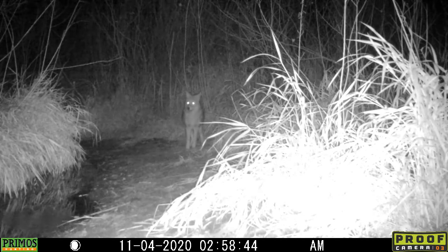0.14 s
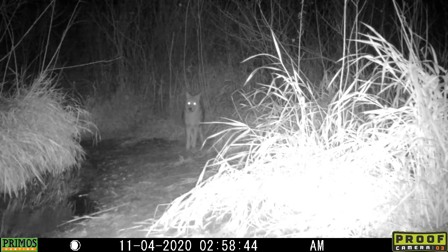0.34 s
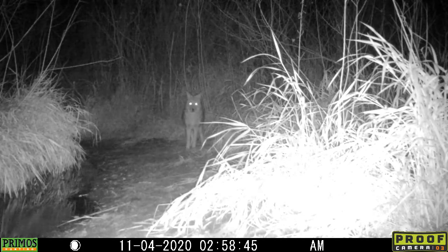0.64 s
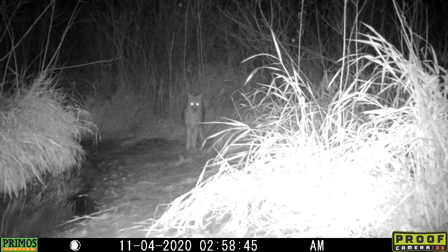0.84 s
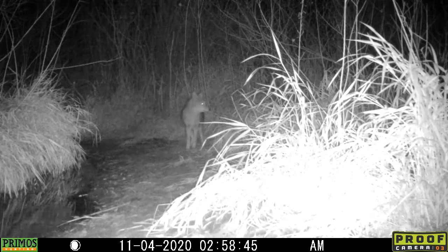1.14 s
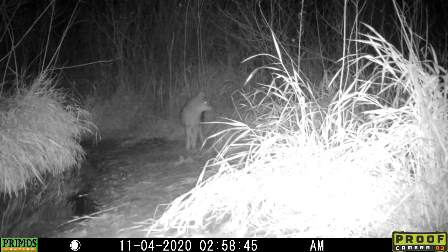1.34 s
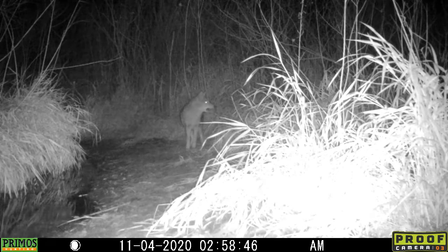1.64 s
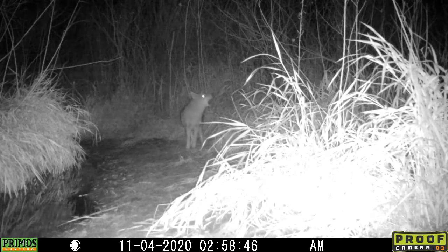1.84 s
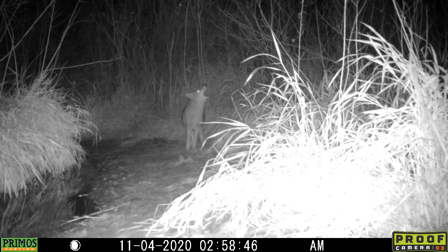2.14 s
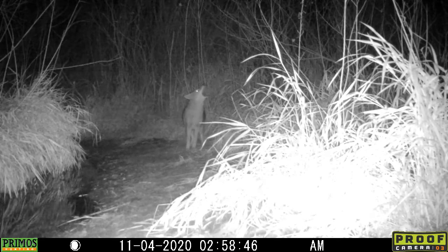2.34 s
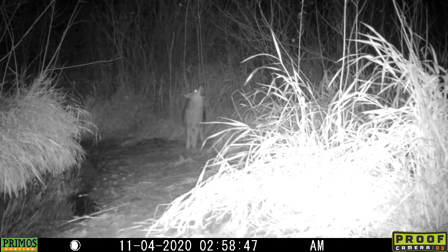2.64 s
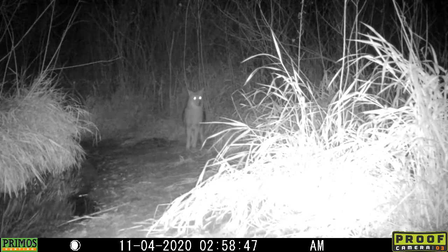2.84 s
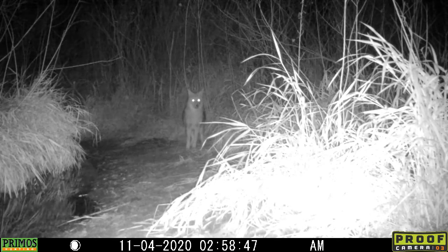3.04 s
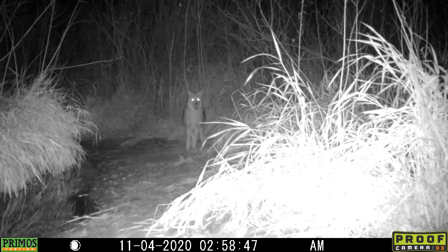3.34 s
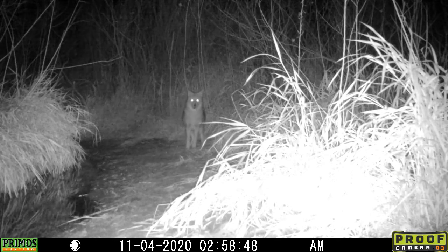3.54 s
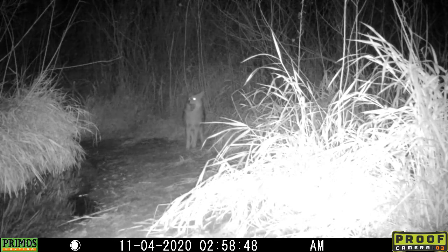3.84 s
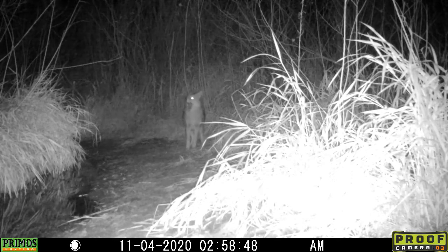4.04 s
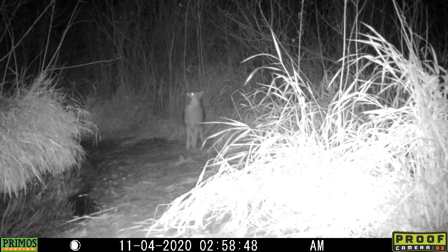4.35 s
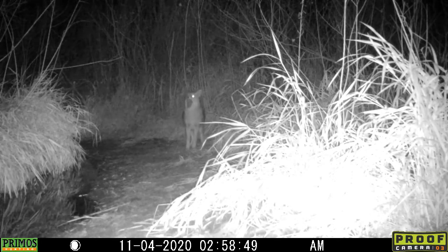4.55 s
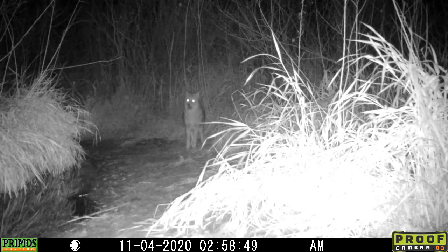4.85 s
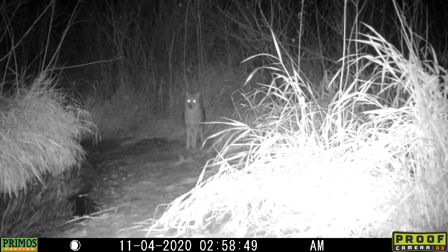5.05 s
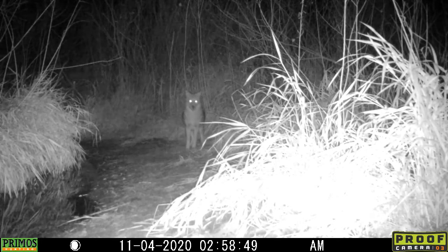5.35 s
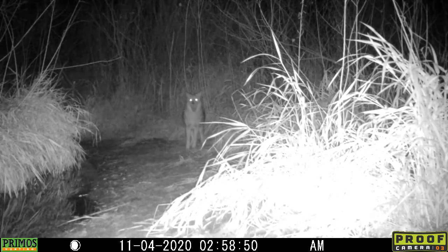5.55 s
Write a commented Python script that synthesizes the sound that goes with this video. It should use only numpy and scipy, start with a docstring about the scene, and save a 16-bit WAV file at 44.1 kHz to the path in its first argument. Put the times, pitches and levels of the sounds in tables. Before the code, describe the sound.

Over the steady hiss and rumble of night air on a small outdoor microphone, a nearby coyote yips and whines softly, then breaks into louder yips and two high, sliding howls. Its voice jumps suddenly in pitch and rasps on the fast glides. Other coyotes yip back from further off, and a faraway chorus rises and eases. A last short yipping call follows, with a slight dull echo from the brush.

```python
"""A short, sharp yip sinks into a soft whine: a coyote a few metres off in a thicket at night.
It builds to loud yips and howls while a packmate, a thin high voice and a distant chorus answer.
Vocal folds sing clean overtones that flip register with a crack of air; throat and jaw colour them,
and fast glides turn them hoarse. Trees add a short echo over the hiss of night air and a trail camera."""
import sys
import numpy as np
from scipy import signal
from scipy.fft import rfft, irfft, next_fast_len
from scipy.io import wavfile
from scipy.ndimage import uniform_filter1d

SR = 44100
rng = np.random.default_rng(int(sys.argv[2]) if len(sys.argv) > 2 else 0)


def bounce(signal):
    """Save signal as a 16-bit WAV file at the path given by the first command-line argument."""
    frames = np.transpose(np.atleast_2d(signal))
    limited = np.clip(frames, -1, 1)
    pcm = np.round(limited * 32767).astype(np.int16)
    wavfile.write(sys.argv[1], SR, pcm)


N = 250488
TOP_HZ = 14250

# near coyote, one list per call; rows a millisecond apart are register flips:
# t/s, pitch/Hz, effort/dB, jaw opening/0-1, partials above the 4th/dB
NEAR_CALLS = [
    [(0.045, 529, -53, 0.15, -9), (0.069, 625, -53.5, 0.0, -10), (0.086, 668, -54, 0.04, -9),
     (0.087, 868, -37, 0.7, -16), (0.105, 955, -34.5, 0.64, -10), (0.106, 1240, -36, 0.3, -12),
     (0.132, 1272, -36.5, 1, -12), (0.147, 891, -38.5, 0.3, -18), (0.16, 844, -41.5, 0.1, -20),
     (0.19, 819, -54, 0.01, -22.0), (0.265, 720, -53.5, 0.0, -3), (0.384, 453, -68, 0.1, -8),
     (0.436, 440, -63, 0.06, -2), (0.574, 431, -62, 0.09, -8), (0.662, 458, -55, 0.1, -4),
     (0.738, 606.6, -52, 0.03, -4), (0.806, 599, -48.5, 0.14, -8), (0.91, 507, -58.5, 0.14, -16.0),
     (0.95, 468, -62, 0.05, -11)],
    [(1.395, 662.0, -39.5, 0.4, -15.0), (1.431, 842, -34.5, 0.71, -18), (1.475, 677.0, -55, 0.7, -16)],
    [(1.705, 757.0, -39, 0.96, -20), (1.733, 974.0, -32, 0.14, -15), (1.795, 810, -38.5, 0.35, -7),
     (1.825, 1001, -28, 0.09, -4), (1.826, 1314, -16, 0.62, -27), (1.856, 1556, -11.5, 0.19, -19.5),
     (1.904, 1616, -18.5, 0.25, -17), (1.92, 1370, -15, 0.29, -37), (1.921, 1071, -23.5, 0.36, -21),
     (1.934, 1015, -27, 0.53, -20), (1.95, 750.0, -33, 0.6, -20.0), (1.988, 720.0, -38, 0.6, -19),
     (2.008, 785, -32.5, 0.5, -15), (2.03, 935, -27.5, 0.29, -27), (2.086, 934, -29, 0.11, -4.5),
     (2.132, 985, -28.0, 0.0, -19), (2.19, 962, -28.5, 0.1, -5), (2.224, 939, -29, 0.14, -10.5),
     (2.26, 947.0, -30.5, 0.06, -6.5), (2.398, 938, -27, 0.14, -12.5), (2.534, 905, -30.5, 0.17, -7),
     (2.648, 876, -31, 0.25, 1.5), (2.7, 820, -33.5, 0.31, -2), (2.74, 769, -36.5, 0.3, 2),
     (2.77, 542, -47, 1.0, -13)],
    [(3.134, 569, -46, 0.68, -11), (3.146, 590, -34.5, 0.64, -10), (3.156, 683, -40.5, 0.44, -9),
     (3.174, 780, -27, 0.74, -11), (3.195, 886, -33.5, 0.71, -8), (3.211, 721, -31.5, 0.74, -6.5),
     (3.26, 477, -45, 0.81, -16)],
    [(3.548, 694, -39, 0.39, -2), (3.56, 747, -31, 0.4, -5), (3.572, 834.0, -34.5, 0.1, -6),
     (3.593, 1010, -20, 0.66, -4), (3.594, 1536, -22, 1.0, -11.0), (3.62, 1822, -21.5, 1.0, -3),
     (3.66, 1970, -22.0, 1.0, -16), (3.734, 1940, -24.5, 0.93, -14), (3.806, 1823, -24.5, 0.82, -14),
     (3.854, 1624, -26, 0.4, -5), (3.88, 1287, -27.0, 0.56, -17), (3.924, 1314, -27.5, 0.73, -14),
     (3.974, 1410, -24.0, 0.38, -16), (4.0, 1318, -25, 0.64, -10), (4.02, 1094, -24.5, 0.77, -17),
     (4.04, 908, -22.5, 0.63, -15.5), (4.1, 872, -25.5, 0.69, -14), (4.112, 899, -21, 0.7, -18),
     (4.126, 1067, -26.5, 0.77, -11), (4.184, 1246, -25.5, 1.0, -13), (4.23, 1496, -20, 0.12, -35),
     (4.256, 1340.0, -25.5, 0.96, -14), (4.286, 1180, -25.0, 0.91, -13.5), (4.406, 1267, -20.5, 0.99, -14),
     (4.44, 1204, -21.5, 0.68, -7.5), (4.484, 1035, -21.5, 0.77, -7.5), (4.524, 956, -25.0, 0.51, -2),
     (4.654, 801, -37.5, 0.09, -0.5), (4.75, 691, -49, 0.01, -1), (4.786, 529.5, -52.0, 0.32, 3),
     (4.84, 474, -55, 0.17, -2)],
    [(5.357, 698, -53, 0.58, -4), (5.373, 843, -26.5, 0.81, -12.5), (5.388, 997, -27, 0.53, -11),
     (5.405, 1187, -31, 0.56, -16), (5.435, 998, -30.5, 0.89, -8), (5.461, 1210.0, -32, 0.7, -12),
     (5.471, 1218, -35.0, 1, -13.0), (5.473, 1632, -29.5, 0.26, -12), (5.491, 1582, -27, 0.24, -20.0),
     (5.506, 1213, -31.5, 0.92, -8), (5.548, 1024, -27.0, 0.69, -17), (5.59, 767, -30.5, 0.7, -11),
     (5.608, 736, -39.5, 0.5, -7), (5.64, 745, -34.5, 0.62, -10), (5.68, 769.0, -29.5, 0.67, -10)],
]
# rasp of each near call on a held pitch: hoarseness/0-1
NEAR_HOARSENESS = [0.18, 0.32, .02, 0.4305, 0.196, 0.351]
# spells where strong and weak cycles alternate without a push: t/s, length/s, level re effort/dB
DOUBLED_SPELLS = [(5.588, .1, -11.5)]
# packmate further off, one pitch arch per call:
# t/s, length/s, first f/Hz, turning f/Hz, last f/Hz, turn point/share of length, effort/dB, jaw/0-1
PACKMATE_CALLS = [(0.02, 0.21, 790, 832, 832, .4, -48.5, 0.9), (.18, .215, 835, 950, 920, .45, -47.5, 0.7),
                  (.4, .04, 906, 850, 780, .5, -55, 0.7), (.57, 0.14, 758.4, 827.5, 809, .2, -48.5, 1),
                  (1.05, .158, 678, 731.6, 890, .55, -45.5, 0.9),
                  (1.212, .185, 845, 923, 840, .7, -43.5, 1), (1.62, 0.11, 688, 802, 899, .5, -45.5, 0.77),
                  (2.73, 0.14, 877, 943, 860, .45, -43.5, 1), (2.87, .095, 1027, 1050, 1065, .3, -47, 0.64),
                  (2.975, 0.097, 920, 765, 790, .6, -46, 0.61),
                  (3.262, .068, 794, 890, 755, .6, -38.5, 0.83), (3.335, 0.13, 770, 941, 920, .7, -46, .8),
                  (4.67, 0.13, 884, 965, 940, .7, -49, 0.81), (4.795, 0.12, 880, 790, 717, .5, -59, .5)]
# thin high voice: same columns
THIN_CALLS = [(2.56, 0.092, 1404, 1536, 1337, 0.49, -42.5, 0.64),
              (3.36, 0.12, 1230, 1426, 1400, 0.68, -37.5, 0.63),
              (3.455, .07, 1413, 1006, 630, 0.49, -59, 0.53),
              (4.165, 0.1, 1395, 1680, 1403, 0.48, -39, 0.7),
              (4.575, 0.12, 1262, 1316, 1230, 0.373, -45.5, 0.86),
              (4.79, .17, 1045, 871, 733, 0.54, -64, 0), (4.965, 0.087, 1224, 1290, 1298, .2, -59, 1)]
# fader ride of the distant chorus: t/s, level/dB
CHORUS_RIDE = [(0, -59), (.9, -55), (1.6, -53), (2.599, -49), (3.1, -46), (3.6, -44), (4.7, -43.5),
               (5.1, -56), (5.35, -54), (5.68, -50)]
# partials 1-4 at the vocal folds: level/dB
FOLDS_DB = [0.063, 0.064, -1.15, -1.7]
# throat tone for partials 1-4, jaw closed and open: f/Hz, level/dB
CLOSED_LOW = [(430.0, 22.5), (650.0, 23.5), (900.0, 12.5), (1100.0, 4), (1300.0, -13), (1600.0, 9.5),
              (2000.0, -1), (2500.0, 5.5), (3000.0, 1), (3600.0, -23.5), (4400.0, -24), (6000.0, -18)]
OPEN_LOW = [(430, -39), (650, -22), (900, -43), (1100, -18.5), (1300, 9), (1600, 1), (2000, -0.5),
            (2500, -5), (3000, -6), (3600, -8.5), (4400, 0), (5000, -3.5), (5600, -3.5), (6100, -27),
            (7600, -19)]
# open-jaw tone of the packmate, whose 1st partial does not carry: f/Hz, level/dB
PACKMATE_OPEN_LOW = [(700, -26), (1100, -16), (1400, 9), (1800, 0), (2700, -13), (3600, -10.5), (4400, -11)]
# throat and mouth tone for upper partials and breath, jaw closed and open: f/Hz, level/dB
CLOSED_HIGH = [(600, -5), (1600, 12), (2850, -1), (3700, -19), (4700, -30), (5600, -12.5), (6200, -7),
               (7000, 9), (7600, -2.5), (8300, -13), (9500, -25), (11000, -13), (14000, -34)]
OPEN_HIGH = [(600, -17), (1600, -14), (2850, -1), (3700, 0), (4400, 11), (5050, 18.5), (5500, 6),
             (6000, -4.5), (6700, -10), (7400, -10), (8200, -4), (9300, -7), (11000, -26), (14000, -23)]
# narrow bands that nearby echoes seem to cancel: f/Hz, width/Hz, share removed/0-1
ECHO_NOTCHES = [(1410, 310, 0.74), (4360, 460, 0.64), (5300, 220, 1), (6890, 260, 0.5), (8060, 630, 0.84),
                (11500, 640, 0.67)]
# tone of the noise bed: f/Hz, relative level/dB
HISS_TONE = [(8.8, -47), (15, 0.5), (43, -2.5), (119, -6.5), (223, -11), (289, -13.5), (333, -13.5),
             (766, -22), (936, -25), (1320, -27.5), (2350, -36.5), (11700, -46.5), (14300, -50.5)]


def coyote(calls, held_hoarseness, open_low, partials, doubled=(),
           fade_s=0.0049, waver=0.001993, shimmer_db=1.92):
    """Vocal folds sing partials on a gliding pitch; hoarse cycles are uneven and leak air."""
    rows = np.concatenate([np.column_stack([call, np.full(len(call), held)])
                           for call, held in zip(calls, held_hoarseness)])
    rows = rows[np.argsort(rows[:, 0])]
    t = np.arange(N) / SR
    slew = int(0.0063 * SR)
    effort_db, jaw, upper_db, hoarse = (uniform_filter1d(np.interp(t, rows[:, 0], column), slew)
                                        for column in rows[:, 2:].T)
    hz, crack, glide = register_flips(np.interp(t, rows[:, 0], np.log(rows[:, 1])), slew)
    jaw = np.clip(jaw, 0, 1)
    hoarse = np.clip(hoarse + 0.222 * glide, 0, 1)  # fast glides roughen the voice
    calling = sum((t > call[0][0] - .001) & (t < call[-1][0] + .001) for call in calls) > 0
    gate = uniform_filter1d(1. * calling, int(fade_s * SR))
    jitter = (0.001514 + 0.01994 * hoarse) * walk(300)
    phase = 2 * np.pi * np.cumsum(hz * (1 + jitter + waver * walk(25))) / SR

    def throat_db(k, opened, closed):
        """The jaw crossfades partial k between two throat tones."""
        return jaw * colour_db(opened, k * hz) + (1 - jaw) * colour_db(closed, k * hz)

    def partial(k, db):
        """One shimmering line at k times the pitch; high ones blur and drop out in patches."""
        db = db + shimmer_db * walk(30)
        treble = np.clip(k * hz / 1000 - 3.2, 0, 5)
        dropout_db = (1.24 + 4.5 * hoarse) * treble * np.abs(walk(16))
        rasp_db = 5 * hoarse * walk(120)
        smear = (0.014 + 0.26 * hoarse) * walk(200)
        gain = np.sqrt(2) * undb(db - dropout_db + rasp_db) * (k * hz < TOP_HZ)
        return gain * np.sin(k * (phase + smear) + k * k / 3)

    low_db = [effort_db + FOLDS_DB[k - 1] + throat_db(k, open_low, CLOSED_LOW) for k in (1, 2, 3, 4)]
    voice = sum(partial(k, db) for k, db in enumerate(low_db, 1))
    half_partials = (2.5, 3.5, 4.5)
    for start, length, db in doubled:
        spell = uniform_filter1d(1. * (t > start) * (t < start + length), slew)
        voice += spell * sum(partial(k, effort_db + db) for k in half_partials)
    if partials > 4:
        high_db = effort_db + upper_db
        for k in range(5, partials + 1):
            voice += partial(k, high_db + throat_db(k, OPEN_HIGH, CLOSED_HIGH))
        # pushed hard, strong and weak cycles alternate and lines appear between the partials
        push_db = low_db[0] + 13
        split_db = np.minimum(1.55 * push_db - 14, 0)
        for k in half_partials:
            voice += partial(k, high_db + split_db)
    voice_level = np.sqrt(sum(undb(db) ** 2 for db in low_db))
    air = jaw * noise(OPEN_HIGH) + (1 - jaw) * noise(CLOSED_HIGH)
    air_db = -30 + 18 * hoarse + 10 * crack
    breath = undb(air_db) * voice_level * (1 + np.cos(phase)) * air  # one puff per cycle
    return gate * (voice + breath)


def register_flips(log_pitch, slew, bend_s=0.01164):
    """The folds bend smoothly but flip at once: gives pitch/Hz, crack/0-1, glide/octaves per 0.1 s."""
    step = np.diff(log_pitch, prepend=log_pitch[0])
    flips = step * (np.abs(step) > 60 / SR)
    register = np.cumsum(flips)
    hz = np.exp(uniform_filter1d(log_pitch - register, int(bend_s * SR)) + register)
    flip_pulse = uniform_filter1d(uniform_filter1d(np.abs(flips), slew), slew)
    crack = np.minimum(flip_pulse * slew * 6, 1)
    glide = uniform_filter1d(np.abs(step - flips), int(0.025 * SR)) * SR / np.log(2) / 10
    return hz, crack, glide


def answers(events, open_low, swell_db=2, **voicing):
    """Lightly hoarse four-partial calls arch through three pitches as the level swells and sinks."""
    arc = np.linspace(-1, 1, 9)
    calls = []
    for start, length, first, mid, last, turn, db, jaw in events:
        t = start + length * np.interp(arc, [-1, 0, 1], [0, np.clip(turn, .1, .9), 1])
        hz = mid + arc * (last - first) / 2 + arc ** 2 * ((first + last) / 2 - mid)
        effort_db = db - swell_db * arc ** 2
        calls.append(np.column_stack([t, hz, effort_db, np.full(9, jaw), np.zeros(9)]))
    return coyote(calls, [.1] * len(calls), open_low, partials=4, **voicing)


def chorus(voices=9, centre_hz=802, waver=.16, come_go_db=6):
    """Wandering voices far back in the brush; only partials 2 and 3 carry, drifting in and out."""
    blend = np.zeros(N)
    for _ in range(voices):
        hz = centre_hz * np.exp(waver * walk(7) + .01 * walk(200))
        phase = 2 * np.pi * np.cumsum(hz) / SR
        blend += undb(come_go_db * walk(9)) * np.sin(2 * phase)
        blend += undb(come_go_db * walk(14) - 7) * np.sin(3 * phase)
    times, db = np.transpose(CHORUS_RIDE)
    return blend / np.std(blend) * undb(np.interp(np.arange(N) / SR, times, db))


def trees(x, t60_s=0.27, wet_db=-21, onset_s=0.0056, damping_hz=5000):
    """Trunks and brush scatter a short, dull tail."""
    t = np.arange(int(t60_s * SR)) / SR
    tail = rng.standard_normal(len(t)) * undb(-60 * t / t60_s) * np.minimum(t / onset_s, 1)
    tail = signal.sosfilt(signal.butter(1, damping_hz, fs=SR, output="sos"), tail)
    return undb(wet_db) * signal.fftconvolve(x, tail / np.linalg.norm(tail))[:N]


def echo_notches(x):
    """Narrow bands are scooped out, as if cancelled by echoes near the microphone."""
    for hz, width, share in ECHO_NOTCHES:
        x = x - share * signal.lfilter(*signal.iirpeak(hz, hz / width, fs=SR), x)
    return x


def hiss(level_db=-30.5):
    """A bed of rumble and hiss from night air and preamplifier, swelling a little."""
    return undb(level_db + .5 * walk(1.12)) * noise(HISS_TONE)


def noise(tone):
    """Noise of rms 1, shaped by a tone curve."""
    size = next_fast_len(N)
    gain = undb(colour_db(tone, np.arange(size // 2 + 1) * SR / size))
    x = irfft(rfft(rng.standard_normal(size)) * gain, size)[:N]
    return x / np.std(x)


def walk(rate_hz):
    """Random sample-and-hold modulator, slewed twice; spread 1."""
    hold = int(SR / rate_hz)
    steps = np.repeat(rng.standard_normal(N // hold + 1), hold)
    x = uniform_filter1d(uniform_filter1d(steps, hold), hold)[:N]
    return x / np.std(x)


def colour_db(tone, hz):
    """Reads a tone curve on a log-frequency axis."""
    f, db = np.transpose(tone)
    return np.interp(np.log(np.maximum(hz, 1)), np.log(f), db)


def undb(db):
    return 10 ** (np.asarray(db) / 20)


def scene():
    """Near coyote up front, the pack behind, all echoing over the noise bed."""
    pack = coyote(NEAR_CALLS, NEAR_HOARSENESS, OPEN_LOW, partials=18, doubled=DOUBLED_SPELLS)
    pack += answers(PACKMATE_CALLS, PACKMATE_OPEN_LOW, waver=0.013, fade_s=0.018, shimmer_db=2.5)
    pack += answers(THIN_CALLS, OPEN_LOW, fade_s=.02, shimmer_db=0.5)
    pack += chorus()
    return (echo_notches(pack + trees(pack)) + hiss())[None]


def record(dry):
    """The camera's steep low-pass cuts the top end."""
    return signal.sosfilt(signal.ellip(10, .2, 60, TOP_HZ, fs=SR, output="sos"), dry)


dry = scene()
out = record(dry)
bounce(out)
```